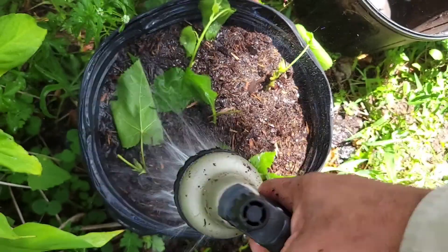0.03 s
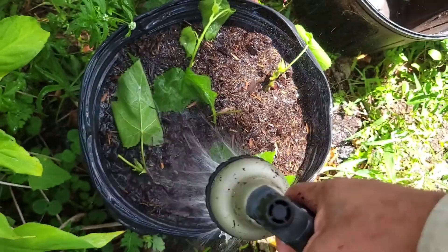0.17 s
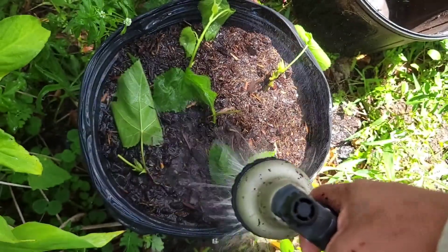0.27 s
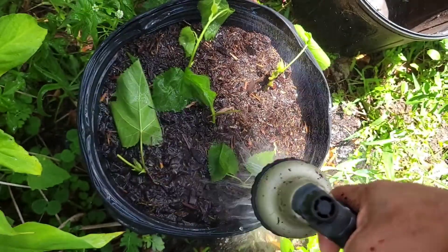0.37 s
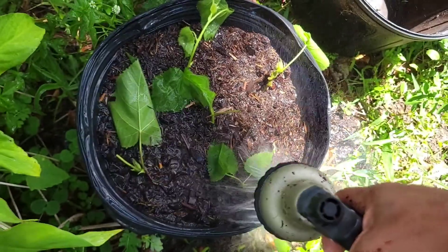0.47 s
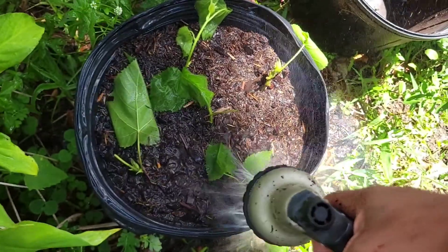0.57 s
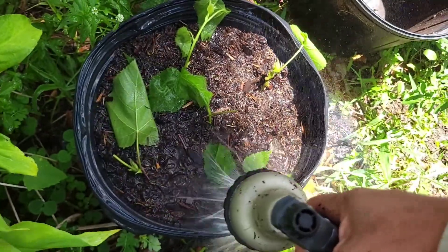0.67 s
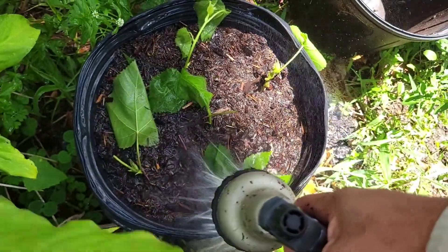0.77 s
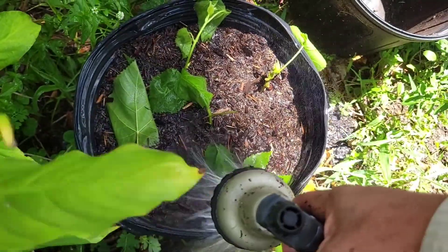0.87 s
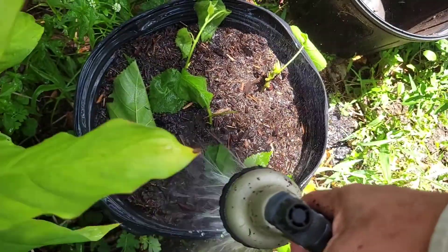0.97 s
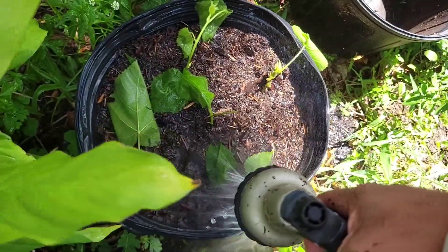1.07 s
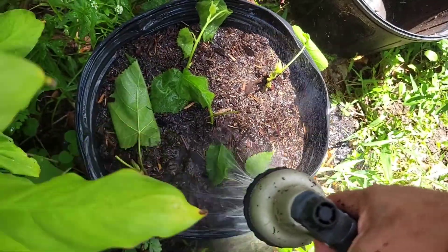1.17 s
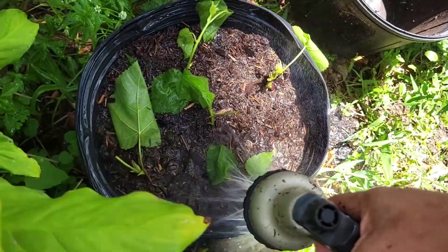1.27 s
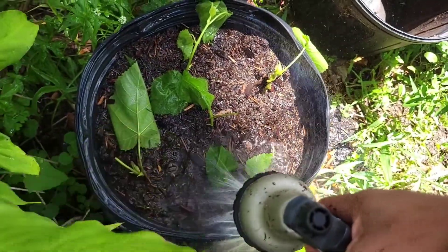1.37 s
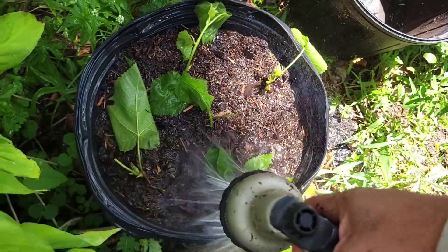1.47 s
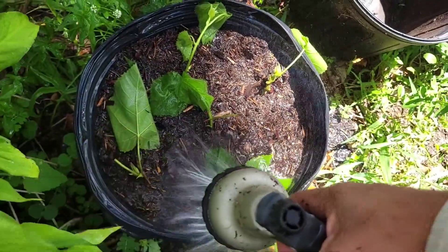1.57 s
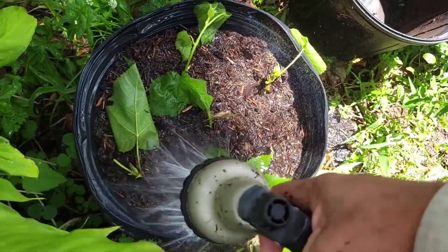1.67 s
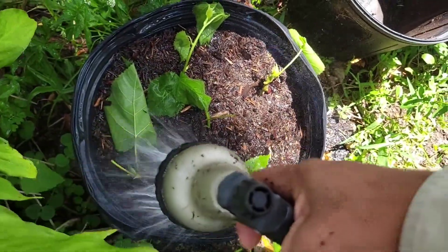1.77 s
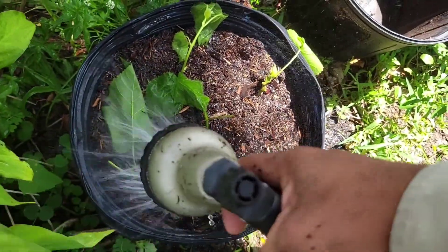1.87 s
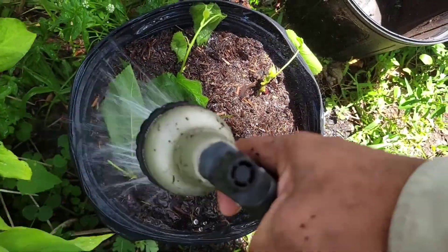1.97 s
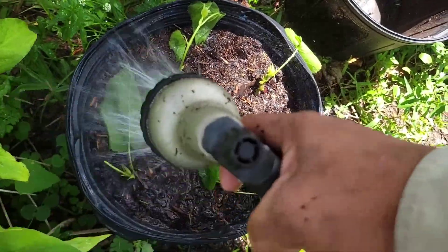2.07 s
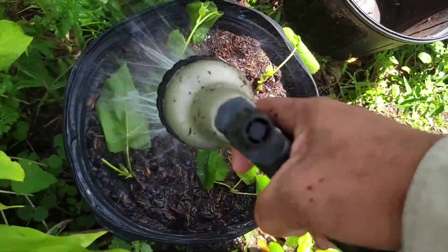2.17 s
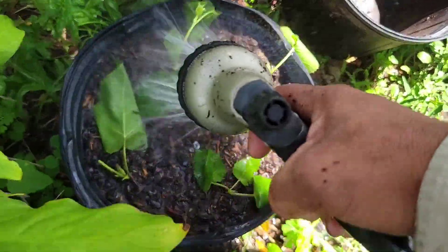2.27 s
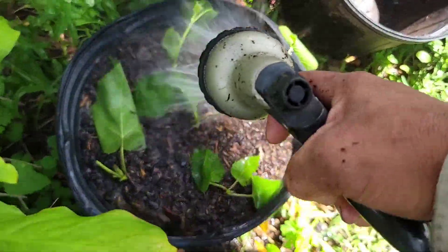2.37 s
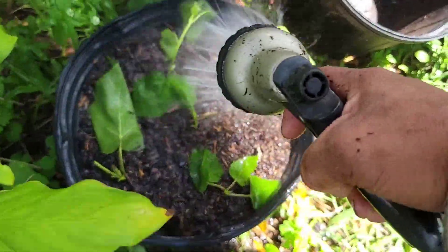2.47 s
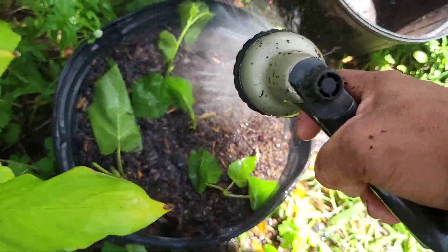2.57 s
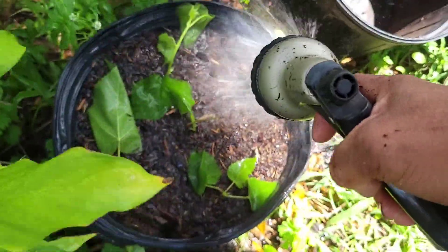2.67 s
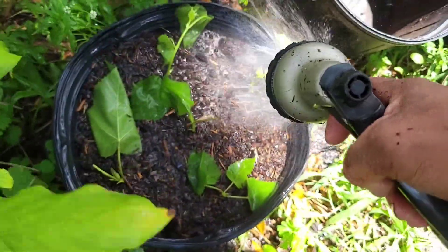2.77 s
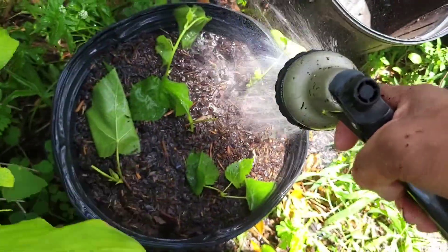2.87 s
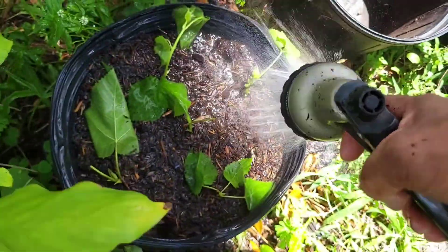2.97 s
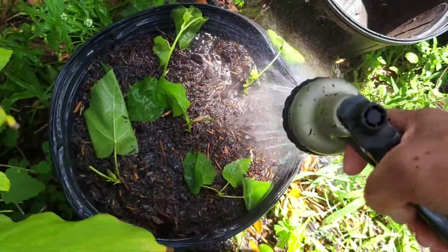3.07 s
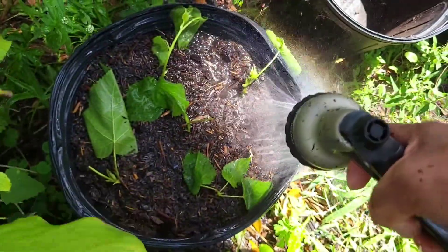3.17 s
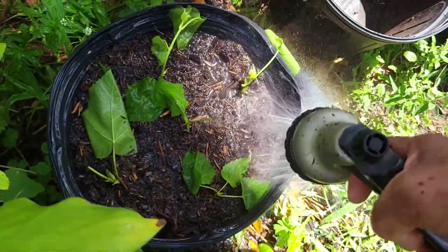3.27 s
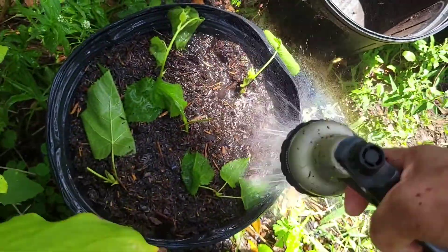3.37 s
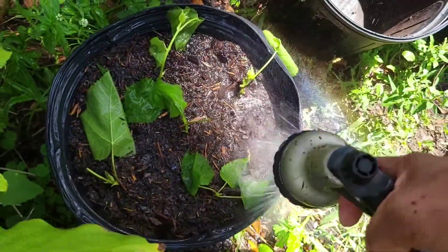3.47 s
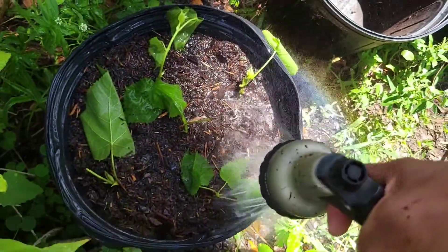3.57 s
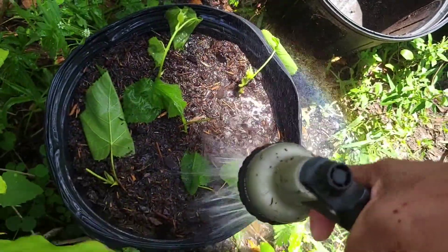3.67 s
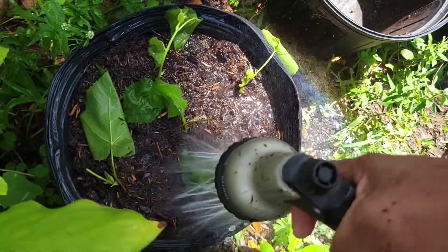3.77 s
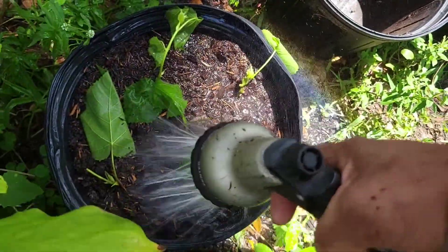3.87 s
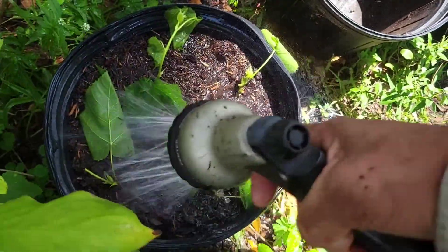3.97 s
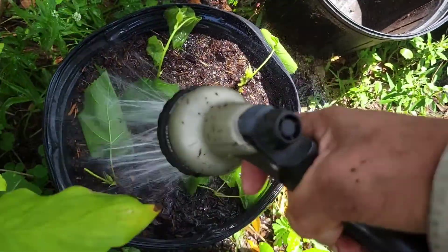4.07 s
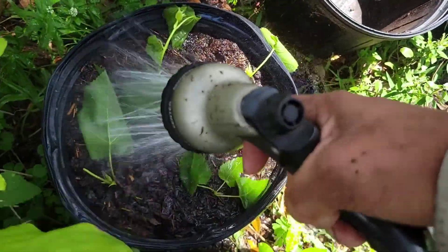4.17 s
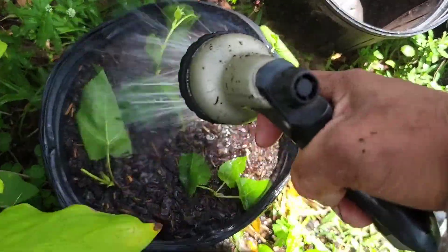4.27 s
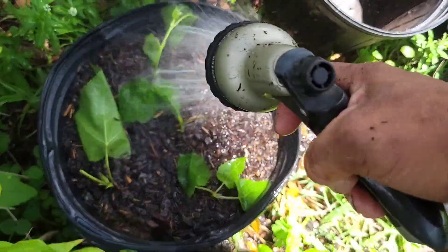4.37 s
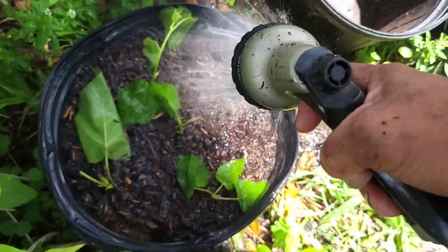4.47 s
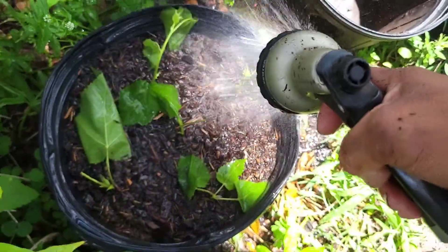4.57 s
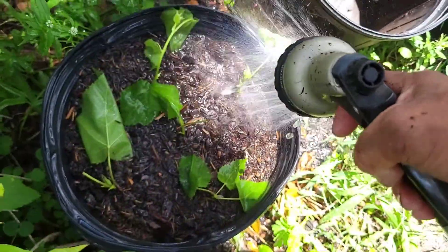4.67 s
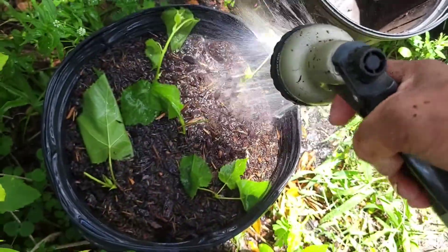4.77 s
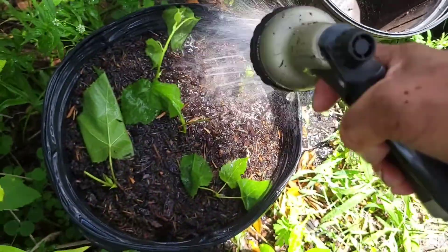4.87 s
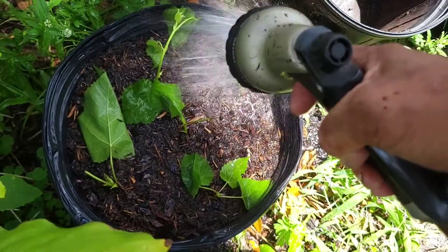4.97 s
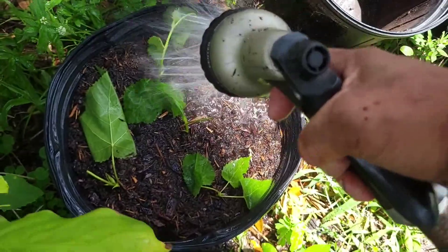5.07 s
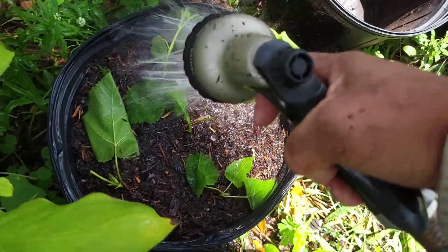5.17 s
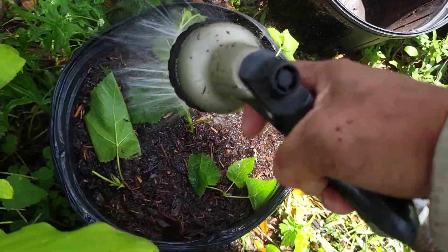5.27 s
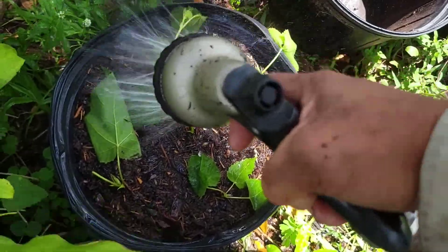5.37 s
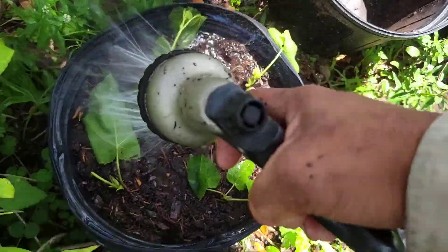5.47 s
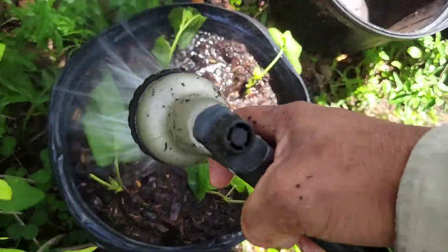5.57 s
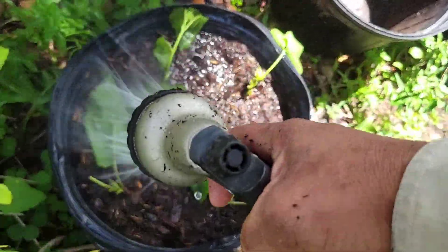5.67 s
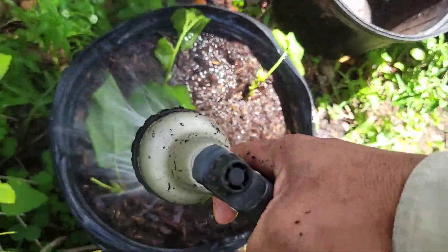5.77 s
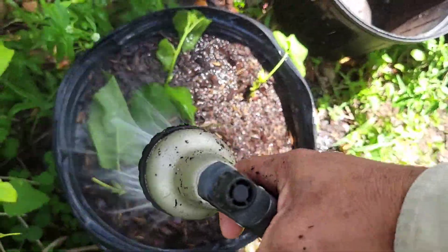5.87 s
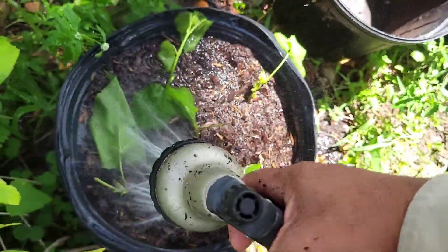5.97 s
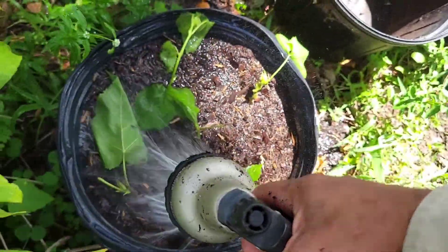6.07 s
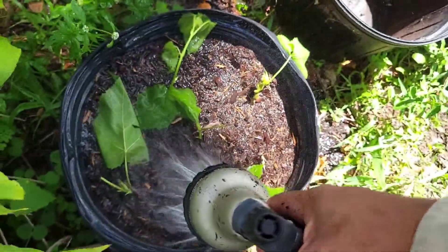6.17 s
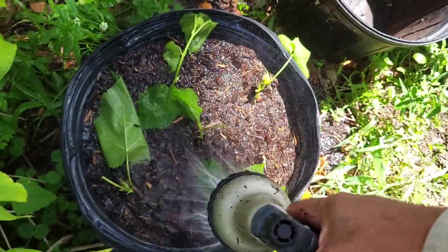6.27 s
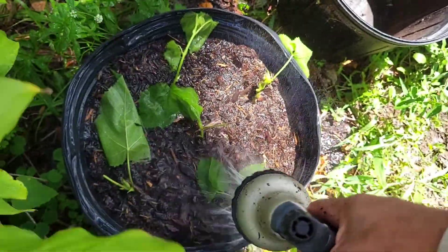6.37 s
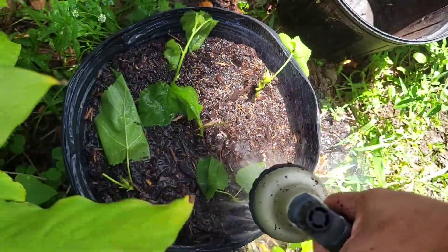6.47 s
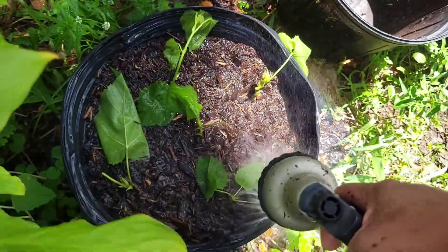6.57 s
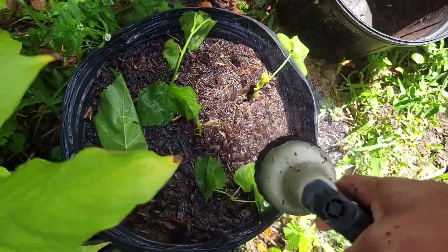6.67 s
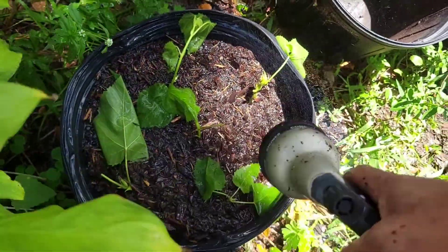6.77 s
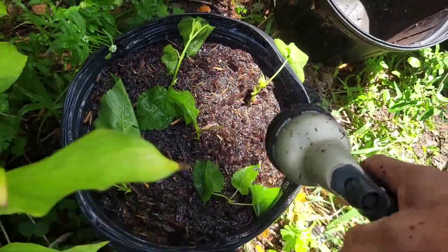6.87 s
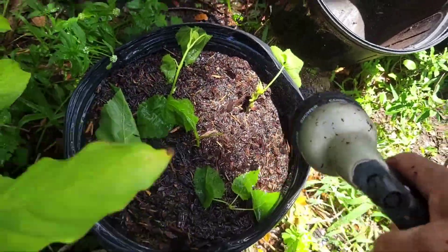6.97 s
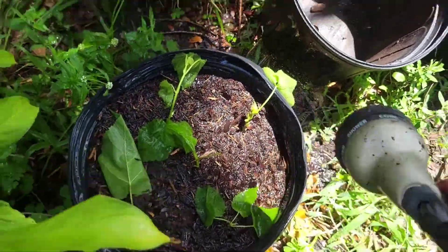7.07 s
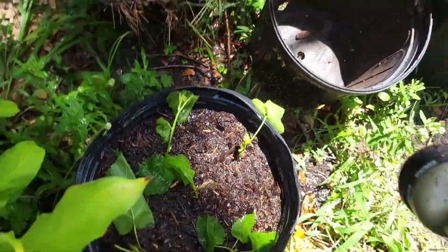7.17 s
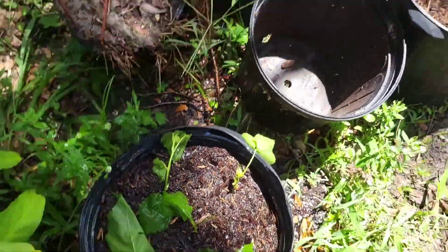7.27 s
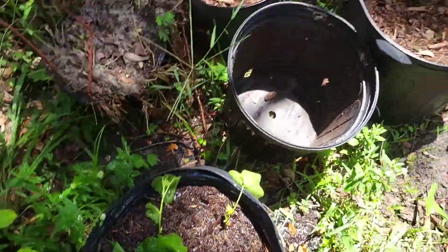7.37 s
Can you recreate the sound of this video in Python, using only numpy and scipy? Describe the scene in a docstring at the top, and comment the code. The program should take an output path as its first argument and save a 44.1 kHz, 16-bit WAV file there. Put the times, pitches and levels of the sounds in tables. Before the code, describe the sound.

Close outdoor stereo of a hand-held hose nozzle watering a potted plant. Bright fizzing hiss and fine soil spatter run steadily, with louder hollow patter whenever the jets sweep across broad leaves and short crisp rattles at edges. Low wind thumps buffet the microphone. Just before seven seconds the water shuts off sharply, leaving tiny drip ticks and a faint insect buzz.

```python
"""Watering a large plant pot

A hand-held hose nozzle is swept around a pot below a two-port microphone, then shut off.
Random impacts, coloured by what they strike, drum on broad leaves and pot wall and spatter on wet soil.
The nozzle hisses as filtered noise; jets crossing rims and leaf edges rattle as short pitched bursts.
Behind, low noise buffets the ports, a narrow noise band hums, insects buzz and the last drops tick."""
import sys
import numpy as np
from scipy import signal
from scipy.fft import rfft, irfft, next_fast_len
from scipy.io import wavfile
from scipy.ndimage import uniform_filter1d, map_coordinates

SR = 44100
rng = np.random.default_rng(int(sys.argv[2]) if len(sys.argv) > 2 else 0)


def persist_wave(psi):
    """Save psi, clipped to +-1, as 16-bit WAV."""
    counts = np.round(np.clip(psi, -1, 1) * 32767).astype(np.int16)
    wavfile.write(sys.argv[1], SR, np.atleast_2d(counts).T)


def to_linear_factor(level_db):
    """Convert decibel levels (scalar or array-like) to linear amplitude factors."""
    exponent = np.asarray(level_db, float) / 20
    return 10 ** exponent


N = 327663
TIME = np.arange(N) / SR


def unit(x):
    """Normalisation: equal mean power, rms 1."""
    return x / np.sqrt(np.mean(x ** 2) + 1e-20)


def along(points, hz):
    """Logarithmic pitch: (Hz, value) points joined by straight lines on a log axis."""
    f, v = np.transpose(points)
    return np.interp(np.log(hz + 1), np.log(f + 1), v)


def curves(rows):
    """Linear interpolation: one value per sample for each column after the time."""
    s, *cols = np.transpose(rows)
    return [np.interp(TIME, s, c) for c in cols]


def wobble(rate):
    """Slow random modulation: a smooth curve through random knots, rate of them a second."""
    knots = rng.standard_normal(int(N * rate / SR) + 4)
    return map_coordinates(knots, [TIME * rate])


def swells(rows):
    """Power addition: bell-shaped (s, dB, rise s, fall s) swells summed as power, returned as a gain."""
    power = 0
    for s, db, rise, fall in rows:
        side = np.where(TIME < s, rise, fall)
        power = power + to_linear_factor(2 * db) * np.exp(-2 * ((TIME - s) / side) ** 2)
    return np.sqrt(power)


def filtered(x, response):
    """Linear filtering: the spectrum of x times a response of frequency."""
    m = next_fast_len(N + 8192)
    return irfft(rfft(x, m) * response(np.fft.rfftfreq(m, 1 / SR)), m)[..., :N]


def coloured(x, spectrum):
    """Spectral shaping: x in a colour of (Hz, dB) points, rms 1."""
    return unit(filtered(x, lambda hz: to_linear_factor(along(spectrum, hz))))


def resonant(x, modes):
    """Resonance: x through a sum of (Hz, width Hz, dB) peaks, rms 1."""
    def response(hz):
        return sum(to_linear_factor(db) / (1 + ((hz - c) / w * 2) ** 2) for c, w, db in modes)
    return unit(filtered(x, response))


def patchy(x, patchy_db):
    """Time-frequency modulation: random gain in patches of about 500 Hz by 50 ms."""
    z = signal.stft(x, nperseg=512)[2]
    field = uniform_filter1d(rng.standard_normal(z.shape[-2:]), size=6, axis=0)
    field = uniform_filter1d(field, size=8, axis=1)
    return signal.istft(z * to_linear_factor(patchy_db * unit(field)), nperseg=512)[1][..., :N]


def drops(per_second, spread_db):
    """Shot noise: two unrelated showers of impacts, most small, a few large, up to a largest size."""
    hit = rng.random((2, N)) < per_second / SR
    size = np.minimum(rng.exponential(size=(2, N)), 3)
    sign = np.sign(rng.standard_normal((2, N)))
    return unit(hit * to_linear_factor(spread_db * size) * sign)


SHUT_S, CLOSING_DB_PER_S = 6.87, 897  # the trigger is let go


def flow():
    """Valve closure: full gain until the trigger is let go, then a fast exponential decay."""
    return to_linear_factor(-CLOSING_DB_PER_S * np.maximum(TIME - SHUT_S, 0))


# Colour of the far rustle. Each row: frequency in Hz, relative level in dB.
GARDEN_COLOUR = [(200, -49), (400, -28), (600, -12), (1000, -18.5), (3000, -21), (4500, -24), (7500, -27.5),
                 (12000, -19), (14800, -20), (15500, -30)]


def garden():
    """Diffuse background: a far rustle of patchy noise, unrelated at the two ports."""
    noise = patchy(rng.standard_normal((2, N)), patchy_db=1.8)
    return to_linear_factor(-62.5) * coloured(noise, GARDEN_COLOUR)


# Bands of the insect buzz. Each row: centre in Hz, width in Hz, relative level in dB.
INSECT_BANDS = [(8700, 800, -3.5), (9700, 600, 1.5), (10900, 700, -7)]
# The buzz comes closer. One row: peak time in seconds, level in dB, rise in seconds, fall in seconds.
INSECT_SWELL = (7.5, -63.5, .2, -0.5)


def insects():
    """Band-limited noise: overlapping resonances, wavering in level, make the buzz."""
    near = np.hypot(to_linear_factor(-68), swells([INSECT_SWELL]))
    buzz = resonant(rng.standard_normal((2, N)), INSECT_BANDS)
    return buzz * near * to_linear_factor(1.5 * wobble(8))


# A wet leaf shifts. One row: time in seconds, level in dB, centre in Hz, width in Hz, length in ms.
LEAF_SHIFT = (7.105, -64.5, 3800, 800, 35)


def rustle():
    """Windowed noise: a brief faint rustle around one pitch."""
    s, db, centre_hz, width_hz, ms = LEAF_SHIFT
    noise = rng.standard_normal((2, N))
    band = filtered(noise, lambda hz: np.exp(-2 * ((hz - centre_hz) / width_hz) ** 2))
    return to_linear_factor(db) * np.exp(-2 * ((TIME - s) * 1000 / ms) ** 2) * unit(band)


def hum():
    """Narrow-band noise: one sharp resonance at 108 Hz wavers loosely while the water runs."""
    noise = rng.standard_normal(N)
    ringing = filtered(noise, lambda hz: 1 / (1 + ((hz - 108) / 5) ** 4))
    return flow() * to_linear_factor(-52.0) * unit(ringing)


# Breeze over the ports. Each row: time in seconds, breeze level in dB, to which each part adds its own.
BREEZE = [(0, -69), (.7, -67.5), (1.05, -53), (1.3, -60), (1.6, -64), (1.9, -58), (2.2, -56.5),
          (2.65, -55.5), (3.3, -57.5), (3.55, -59.5), (3.85, -56), (4.3, -64.5), (4.7, -61), (5.2, -63),
          (5.7, -62.5), (6.2, -65), (6.42, -60), (6.9, -64.5), (7.15, -60), (7.43, -60)]
# Gusts that thump the ports. Each row: time in seconds, relative thud level in dB, length in seconds.
GUSTS = [(0.116, -46, 0.044), (.42, -54, 0.096), (0.884, -46.5, 0.12), (1.18, -39.5, 0.078),
         (1.445, -51.5, 0.059), (2.398, -50, .12), (2.59, -32, .04), (2.74, -37.5, .05), (2.924, -37, 0.11),
         (3.075, -45, .06), (3.35, -40.5, 0.11), (3.838, -47, 0.15), (4.28, -45, 0.057),
         (5.133, -48, 0.037), (5.43, -52.5, 0.082), (5.715, -49, 0.064), (6.267, -44, 0.084),
         (6.425, -40, 0.043), (6.805, -44, 0.066), (7.055, -45.5, 0.025), (7.21, -45, 0.09),
         (7.35, -38, .06), (7.41, -41, .05)]
# Colour of the low pressure swings. Each row: frequency in Hz, relative level in dB.
BUFFET_COLOUR = [(13, -48), (22, -10), (47, -2), (69, 1.5), (99, -5), (125, -21), (170, -35), (300, -63)]
# Colour of the higher flutter. Each row: frequency in Hz, relative level in dB.
FLUTTER_COLOUR = [(60, -23), (120, -3.5), (200, -13), (270, -19.5), (340, -16.5), (450, -22.5),
                  (900, -40.5), (2000, -69)]
THUD_OVER_DB = 7  # steady thud over the breeze level
LEFT_DB, LEANS = 7, 0.72  # the left port is upwind, more so in a stronger breeze (dB per dB)


def wind():
    """Turbulent pressure: lumpy low swings and a higher flutter, mostly unrelated from port to port."""
    breeze_db, = curves(BREEZE)
    gusts = swells([(s, db, length, length) for s, db, length in GUSTS])
    thud_gain = np.hypot(to_linear_factor(breeze_db + THUD_OVER_DB), gusts)
    pan_db = LEFT_DB + LEANS * (breeze_db - breeze_db.mean()) + 6.2 * wobble(9)
    side = to_linear_factor(np.array([pan_db, -pan_db]) / 2)
    air = rng.standard_normal((2, N)) + 0.84 * rng.standard_normal(N)  # partly shared by the ports
    lumps = to_linear_factor(2.8 * np.array([wobble(15), wobble(18)]))
    thud = thud_gain * to_linear_factor(1.5) * unit(lumps * coloured(air, BUFFET_COLOUR))
    flutter = unit(lumps ** 1.12 * coloured(rng.standard_normal((2, N)), FLUTTER_COLOUR))
    return side * (thud + to_linear_factor(breeze_db + 5 + 2.0 * wobble(8)) * flutter)


# The last drops. Each row: start in seconds, tone level in dB, pitch in Hz, left over right in dB.
LAST_DROPS = [(6.936, -55, 2700, 0), (6.963, -56, 2800, 0), (6.991, -50.5, 6200, 0), (7.005, -49, 10930, 1),
              (7.052, -64, 3020, 2), (7.087, -47, 9000, 0), (7.094, -57, 453, 1), (7.13, -51.5, 450, 5),
              (7.164, -51, 2200, 0), (7.165, -37, 9300, -2), (7.186, -48, 6300, 9), (7.213, -59, 3000, 0),
              (7.291, -56, 14000, 3), (7.312, -53, 6140, 0), (7.381, -49, 7100, 0)]


def drips():
    """Damped oscillation: each drop is a tick of a few cycles with a short noise click."""
    out = np.zeros((2, N + SR))
    t = np.arange(SR // 50) / SR
    for s, db, hz, pan_db in LAST_DROPS:
        tone = np.exp(-t * hz / 4.2) * np.sin(2 * np.pi * hz * t)
        click = .3 * np.exp(-t / .0008) * rng.standard_normal(len(t))
        side = to_linear_factor(db + np.array([[pan_db], [-pan_db]]) / 2)
        out[:, round(s * SR):][:, :len(t)] += side * (tone + click)
    return out[:, :N]


# Sweeps of the jets over the hollow pot wall.
# Each row: fullest cover in seconds, relative drumming level in dB, rise in seconds, fall in seconds.
WALL_PASSES = [(.58, -43.5, .14, 0.091), (1.12, -42.5, 0.18, 0.18), (2.93, -38.5, 0.16, 0.28),
               (3.65, -42, .05, .1), (4.78, -35.5, 0.14, 0.15), (5.15, -37, .06, 0.089)]
# Modes of the wall. Each row: frequency in Hz, width in Hz, relative level in dB.
WALL_MODES = [(824, 140, -3), (1200, 164, 2.5), (1744, 110, -3)]


def wall():
    """Modal ringing: drops drum on the thin plastic wall, which rings in a few broad modes."""
    return swells(WALL_PASSES) * resonant(drops(3500, spread_db=2.0), WALL_MODES)


# Sweeps of the jets over a broad leaf.
# Each row: fullest cover in seconds, relative drumming level in dB, rise in seconds, fall in seconds.
LEAF_PASSES = [(.12, -28, 0.068, 0.096), (.38, -44.5, 0.061, 0.037), (.58, -43.5, 0.12, 0.046),
               (.8, -41.5, .08, 0.097), (1.15, -42, 0.13, 0.096), (1.45, -42, 0.42, .15),
               (1.7, -41, 0.039, 0.15), (2.16, -27, 0.2, 0.21), (2.385, -20.5, .2, 0.038),
               (2.55, -36.5, 0.19, 0.23), (2.91, -37.5, 0.26, 0.44), (3.63, -37, 0.032, 0.084),
               (4.3, -25.5, 0.098, 0.13), (4.45, -21, 0.073, 0.037), (4.56, -33, 0.094, 0.064),
               (4.76, -36, 0.18, 0.21), (5.13, -31.5, 0.096, 0.18), (5.45, -33, .1, 0.17),
               (5.63, -25, 0.056, 0.067), (5.74, -18, 0.083, 0.088), (5.87, -23.5, 0.19, 0.2),
               (6.25, -28, 0.35, 0.1), (6.58, -39.5, 0.052, 0.079), (6.82, -45.5, 0.064, 0.15)]


def drumming():
    """Power addition: sweeps over the leaves join stray drops that always reach some leaf."""
    return np.hypot(swells(LEAF_PASSES), to_linear_factor(-45.5))


# Colour of drops on leaves. Each row: frequency in Hz, relative level in dB per Hz.
LEAF_COLOUR = [(330, -38), (500, -22), (700, -12), (950, -7), (1200, 0), (1400, 0), (1550, -3), (1720, -3),
               (2000, -6), (2600, -9), (3300, -10), (4500, -18), (6300, -16), (7500, -24), (12000, -36)]


def leaves(surge):
    """Sparse shot noise: fewer drops than on soil excite the leaves' own colour."""
    impacts = patchy(drops(3500, spread_db=0), patchy_db=-1.5)
    return drumming() * to_linear_factor(0.51 * surge + 0.61 * wobble(90)) * coloured(impacts, LEAF_COLOUR)


# Nozzle held nearer or further.
# Each row: time in seconds, hiss level in dB before a fixed lift, soil spatter relative to that in dB.
NOZZLE_DISTANCE = [(0, -30, 1), (.25, -30.5, -1.5), (.55, -31, -2.5), (.7, -29.5, -1.5), (.95, -30.5, -2.5),
                   (1.3, -31, -2), (1.6, -31, -0.5), (2.0, -29.5, -4.5), (2.55, -31.5, 5.5),
                   (2.9, -29, -4.5), (3.3, -28, -7), (3.65, -28.5, -2.5), (4.0, -29.5, -2.5),
                   (4.3, -28, -2.5), (4.6, -29.5, -1.5), (4.8, -27.5, -5), (5.0, -29.5, -2), (5.2, -26, -4),
                   (5.32, -30.5, 2), (5.45, -26.5, -2.5), (5.8, -30.5, 2), (6.25, -29.5, 1.5),
                   (6.48, -30, -3.5), (6.85, -29, 0)]


def distance_levels():
    """Distance law by table: levels of hiss and soil spatter in dB, before later gains."""
    hiss_db, soil_db = curves(NOZZLE_DISTANCE)
    return hiss_db, hiss_db + soil_db


# Colour of drops on wet soil. Each row: frequency in Hz, relative level in dB per Hz.
SOIL_COLOUR = [(200, -62), (330, -14.5), (420, -12), (550, -6), (1200, -5), (2300, -5), (3300, 1.5),
               (4200, -3), (5000, -7), (6200, -1), (7400, -6), (9000, -8), (16000, -5.5)]


def soil(surge):
    """Dense shot noise: fine rain on soil, with run-off from a drummed leaf 12 dB under its drumming."""
    _, spatter_db = distance_levels()
    spatter = np.hypot(to_linear_factor(spatter_db), to_linear_factor(-12) * drumming())
    impacts = patchy(drops(9000, spread_db=2.5), patchy_db=2.5)
    return spatter * to_linear_factor(1.13 * surge) * coloured(impacts, SOIL_COLOUR)


# Jets crossing rims and leaf edges. Each row: middle in seconds, relative level in dB, centre in Hz,
# width in octaves, length in ms.
EDGE_CROSSINGS = [(0.123, -32, 3040, 0.72, 50), (.444, -24.5, 8530, 1.2, 8), (.488, -27, 5520, 1.7, 19),
                  (.53, -32.5, 3770, 1.1, 71), (.575, -31.5, 3940, 1.4, 23), (.688, -32.5, 12700, .38, 22),
                  (.885, -27, 5020, 0.99, 45), (1.232, -30, 5400, 1.4, 47), (2.3, -28.5, 6000, 2.2, 35),
                  (2.384, -22.5, 3300, 0.55, 27), (2.428, -20.5, 5230, 0.94, 18),
                  (2.433, -26, 10000, 1.2, 17), (2.963, -27.5, 9040, .81, 23), (3.6, -38, 3320, 0.66, 32),
                  (3.752, -26.5, 5230, 0.76, 22), (3.766, -31, 4120, 0.071, 49),
                  (3.779, -25, 4970, .67, 13), (4.29, -32.5, 5600, 0.5, 66), (4.315, -22, 7530, 2.1, 8),
                  (4.43, -36, 5800, 0.42, 26), (4.48, -20.5, 5700, 0.47, 11),
                  (4.605, -30.5, 3280, 0.76, 27), (4.789, -28, 10800, .55, 32),
                  (5.094, -27.5, 4220, 0.69, 40), (5.16, -27.5, 4540, 1.8, 52),
                  (5.229, -25.5, 10170, .41, 17), (5.39, -30.5, 3500, 1.7, 50), (5.6, -27, 5940, 0.4, 38),
                  (5.63, -28, 12000, 0.74, 30), (5.727, -28, 3440, 0.78, 17),
                  (5.821, -39.5, 5800, 0.32, 58), (5.941, -27, 5450, 0.46, 26), (6.012, -26, 5450, .24, 10),
                  (6.115, -26.5, 4630, 2, 14), (6.247, -31, 4430, .31, 20), (6.375, -23.5, 3700, 0.45, 22),
                  (6.547, -29, 3800, .64, 24), (6.83, -26.5, 5700, 1.1, 14)]


def crossings():
    """Band-passed impacts: each crossing is a short swell of dense taps ringing around one pitch."""
    out = np.zeros((2, N))
    hz = np.fft.rfftfreq(8192, 1 / SR)
    t = (np.arange(8192) - 4096) / SR
    for s, db, centre_hz, octaves, ms in EDGE_CROSSINGS:
        taps = rng.standard_normal((2, len(t))) * to_linear_factor(3.5 * rng.standard_normal(len(t)))
        band = np.exp(-2 * (np.log2(hz / centre_hz + 1e-9) / octaves) ** 2)
        swell = np.exp(-2 * (t * 1000 / ms) ** 2)
        at = round(s * SR) - len(t) // 2
        out[:, at:at + len(t)] += to_linear_factor(db) * swell * unit(irfft(rfft(taps) * band))
    return out


# Where the water lands. Each row: time in seconds, lead of the left port in ms before the detour factor.
AIM = [(0.0, .15), (.6, 0.029), (1.2, 0.063), (1.5, 0.029), (2.1, 0.17), (2.4, .16), (2.8, .07),
       (3.6, 0.026), (3.9, 0.038), (4.2, 0.17), (4.5, .18), (4.8, 0.068), (5.1, 0.072), (5.7, 0.18),
       (6.3, 0.21), (6.6, 0.019), (6.9, .029)]
# Likeness of the ports for landing water. Each row: frequency in Hz, correlation from 0 to 1.
LIKENESS = [(300, .35), (600, .93), (1500, .95), (3000, .8), (6000, .6), (12000, .3)]


def landed(pair, detour):
    """Interaural-style cues: two showers mixed to a set correlation, the right port hearing them late."""
    def turn(hz):
        return np.arccos(np.clip(along(LIKENESS, hz), 0, 1)) / 2
    mid, side = filtered(pair, lambda hz: np.array([np.cos(turn(hz)), np.sin(turn(hz))]))
    late = np.arange(N) - detour * curves(AIM)[0] * SR / 1000
    right = map_coordinates(mid - side, [late], order=5, mode="nearest")
    return np.array([mid + side, right])


# Colour of the nozzle. Each row: frequency in Hz, relative level in dB per Hz.
HISS_COLOUR = [(1500, -27), (4000, -5.5), (7400, -5.5), (8800, 1.5), (10000, 0), (11600, -3), (12500, 3),
               (15800, -0.5)]


def nozzle(surge):
    """Jet noise: the nozzle holes hiss, then the nozzle empties after the valve has closed."""
    hiss_db, _ = distance_levels()
    fizz = drops(16000, spread_db=4.5) + 0.7 * rng.standard_normal((2, N))
    gain = to_linear_factor(hiss_db + 4 + 0.32 * surge + 0.84 * wobble(14))
    dribble = to_linear_factor(-21 - 170 * np.maximum(TIME - SHUT_S, 0))  # falls 170 dB per second
    hiss = coloured(patchy(fizz, patchy_db=2.0), HISS_COLOUR)
    return np.hypot(flow(), dribble) * gain * hiss


def spray():
    """Superposition: landing water and nozzle hiss add, pulsing together with the flow."""
    surge = wobble(14)  # the flow pulses a little
    # long waves bend further round the housing
    landing = landed(leaves(surge) + wall(), detour=1.163)
    landing = landing + landed(soil(surge) + crossings(), detour=0.83)
    # small drops move no air at low pitch
    landing = filtered(landing, lambda hz: 1 / (1 + (360 / (hz + 1)) ** 9))
    return flow() * np.sqrt(2) * landing + nozzle(surge)


def scene():
    """Superposition: all sources add as pressures at the two ports."""
    return garden() + insects() + rustle() + hum() + wind() + drips() + spray()


def low_pass(x):
    """Removes everything above the highest recorded frequency."""
    return signal.sosfilt(signal.butter(12, 17070, fs=SR, output="sos"), x)


# The ports face apart. Each row: frequency in Hz, left over right in dB.
PORT_BALANCE = [(250, -2.5), (520, 3.5), (800, 3), (1100, -3), (1400, 5), (1550, -6.5), (1720, 9.5),
                (2000, 0), (2900, 1.5), (4050, -2), (5000, 2.5), (6300, 1), (7400, 0.5), (8200, 6.5),
                (10000, 2), (12500, 4.5), (15500, 9.5)]
# The left port's housing turns the phase around its resonances.
# Each row: frequency in Hz, lead of the left port in radians.
HOUSING_PHASE = [(300, 0.079), (800, 0.21), (1200, 0.51), (1520, 0.78), (1760, -0.46), (2300, 0.23),
                 (3000, -0.14), (4000, 0.026)]
TOP_HZ = 15850


def record(dry):
    """Diffraction and band limiting: each port has its own colour and phase, with a steep upper limit."""
    half = np.array([[.5], [-.5]])  # differences are shared evenly between left and right

    def response(hz):
        colour = to_linear_factor(half * along(PORT_BALANCE, hz))
        phase = np.exp(1j * half * along(HOUSING_PHASE, hz))
        limit = np.clip((TOP_HZ - hz) / 150 + .5, 0, 1) ** 2
        return colour * phase * limit
    return low_pass(filtered(dry, response))


dry = scene()
out = record(dry)
persist_wave(out)
```